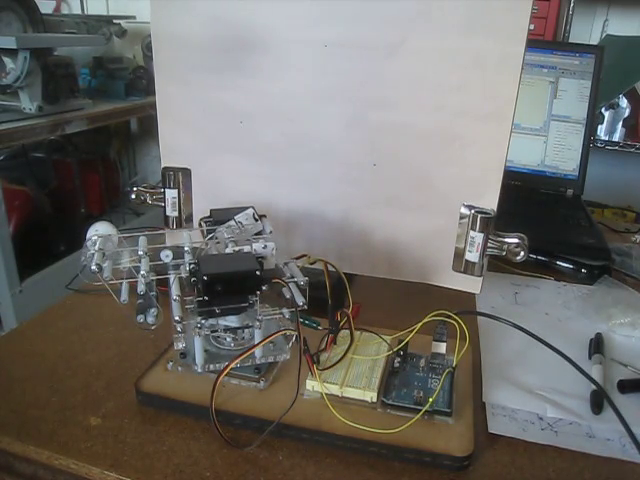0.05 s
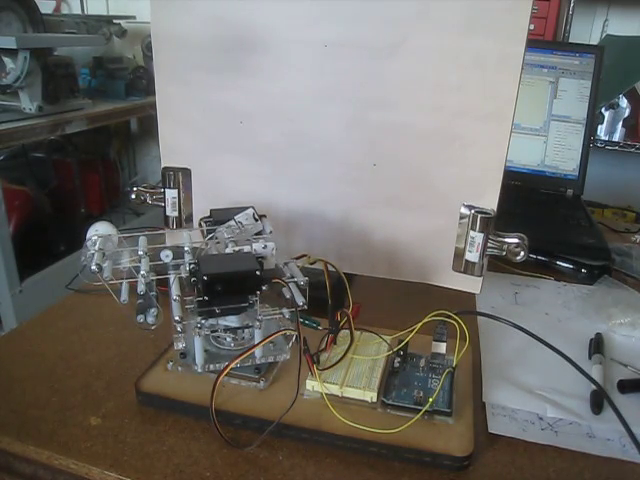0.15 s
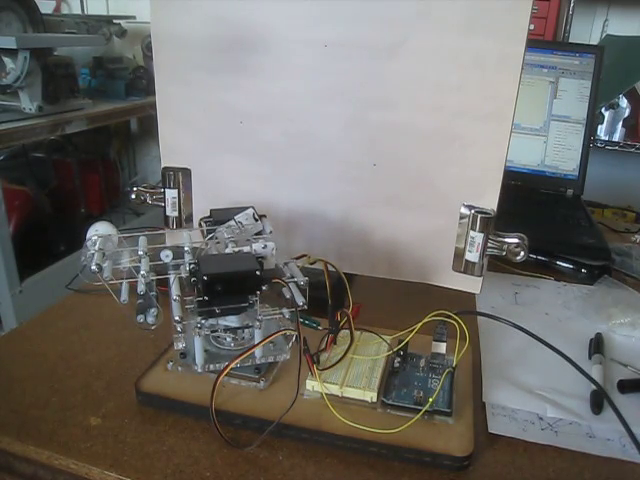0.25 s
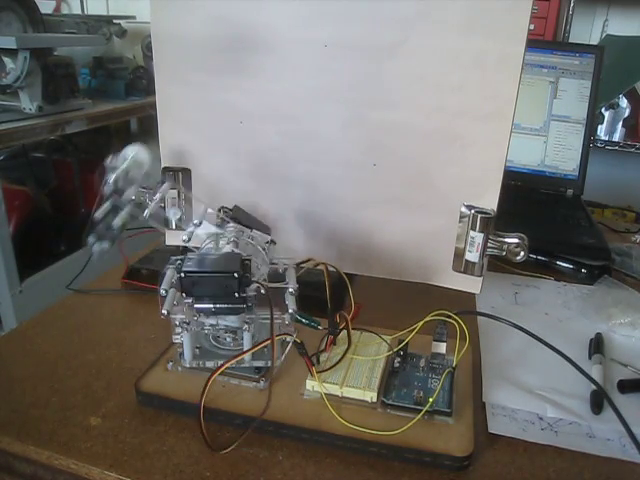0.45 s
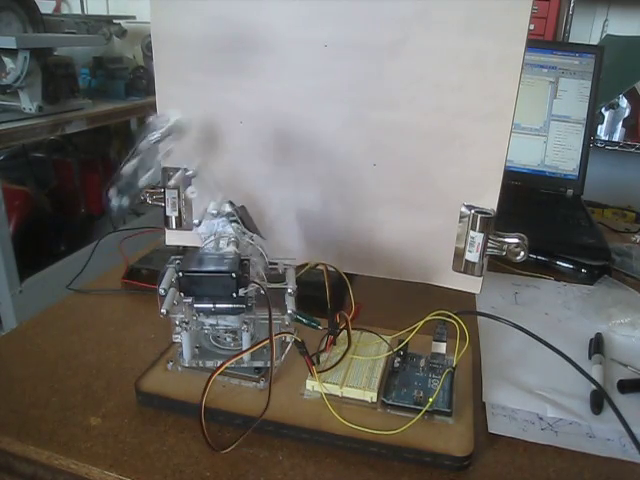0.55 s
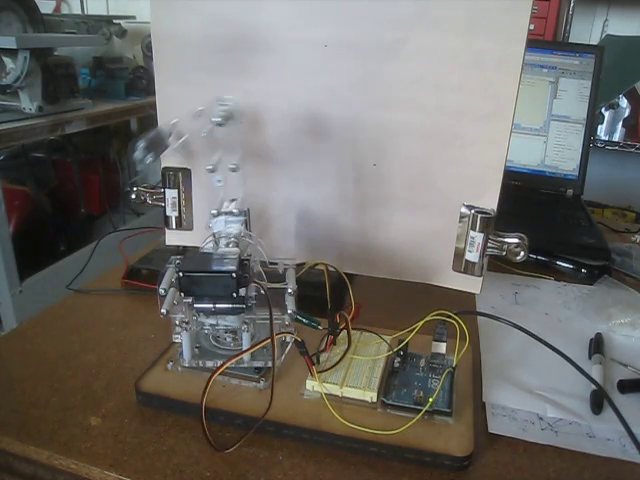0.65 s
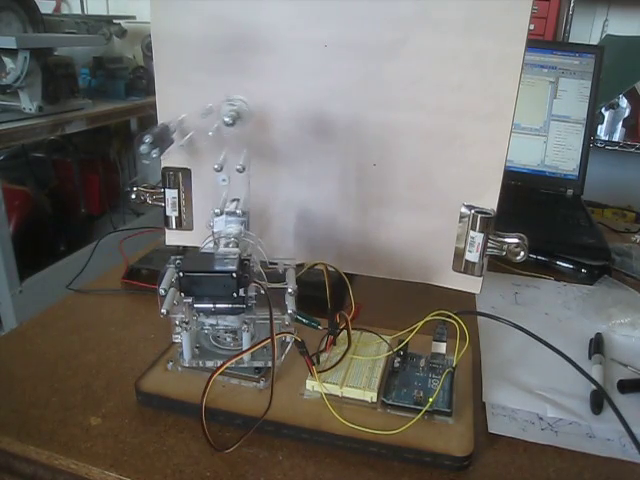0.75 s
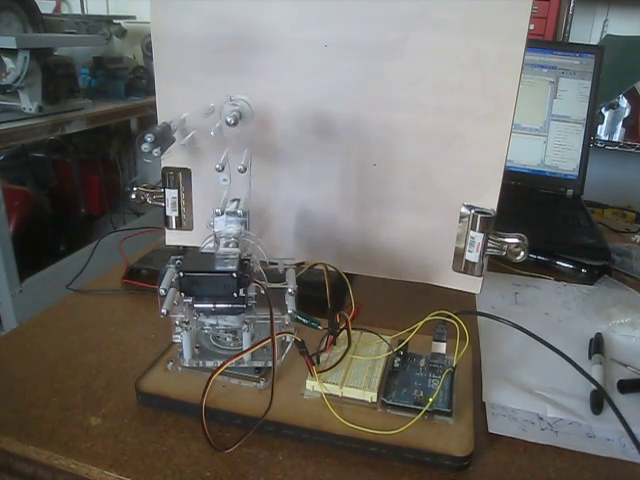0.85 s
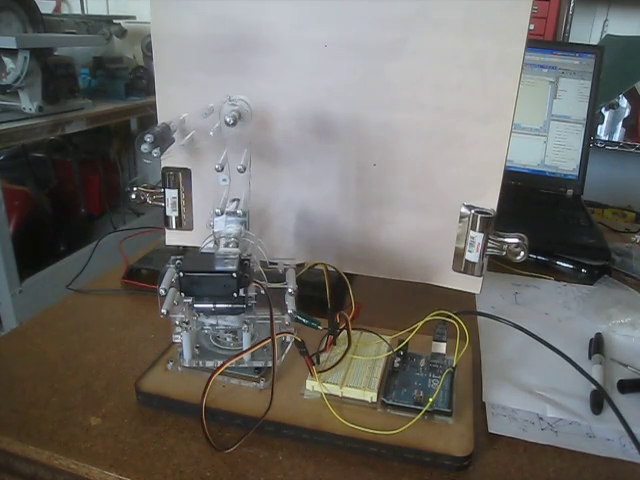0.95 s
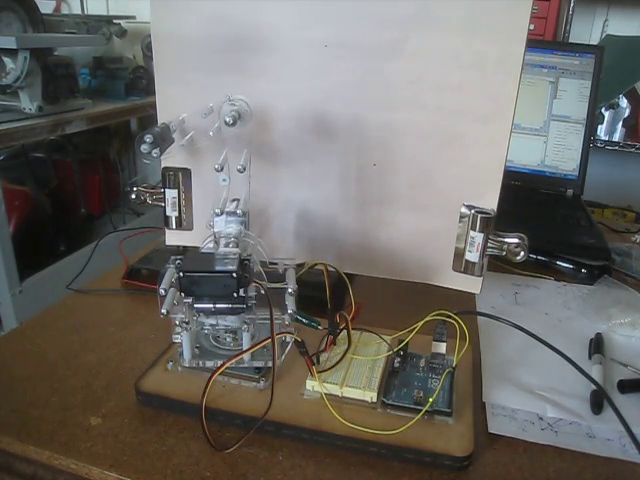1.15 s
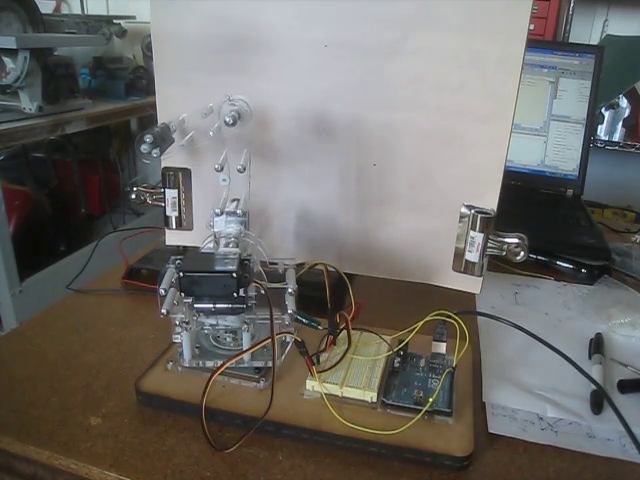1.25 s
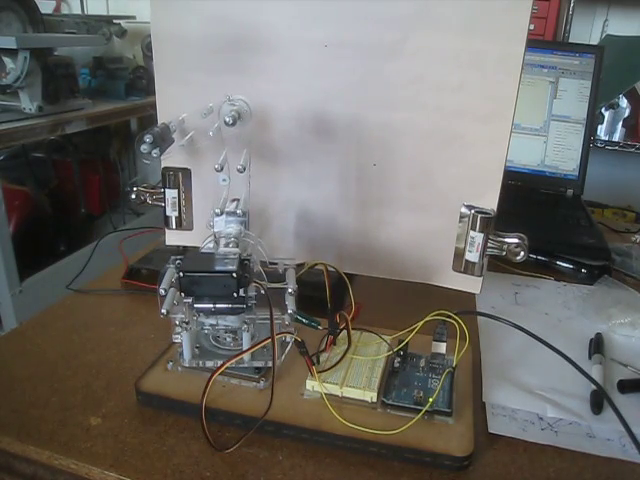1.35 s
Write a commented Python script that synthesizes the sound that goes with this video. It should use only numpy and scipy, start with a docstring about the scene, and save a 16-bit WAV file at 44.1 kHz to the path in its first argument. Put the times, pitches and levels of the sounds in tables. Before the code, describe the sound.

Servo motors move a small plastic arm on a desk. Soft air noise and low hum run throughout. At about 0.2 seconds comes a tiny buzzing twitch; from 0.28 a tick, a sharp squeal and rattling gears lead into a high, raspy whine, climbing by 0.4, wavering, then dropping and stopping near 0.7. Faint ticks follow at 0.7, 0.76 and 0.9, then only quiet room.

```python
"""Robot arm on a desk

Small servos lift and turn a plastic arm: one short twitch, then a half-second move.
Meshing gear teeth whine and rasp, and loose gears chatter through the ringing case; soft noise swells
thicken the whine. A second servo squeals briefly as the move starts, the case rings up in two short bursts,
and joints tick, the last ticks as the arm settles. Filtered noise and phase-drifting tones make the air
noise and hum of a small room.
"""
import sys
import numpy as np
from scipy import signal
from scipy.fft import rfft, irfft
from scipy.io import wavfile

SR = 44100
rng = np.random.default_rng(int(sys.argv[2]) if len(sys.argv) > 2 else 0)


def to_wav(s):
    """Save 16-bit WAV."""
    ch = np.atleast_2d(s).T  # columns
    pcm = np.round(np.clip(ch, -1, 1) * 32767)  # PCM
    wavfile.write(sys.argv[1], SR, pcm.astype(np.int16))


N = 61739
T = np.arange(N) / SR  # time (s)


def amp(db):
    """Logarithmic level: decibels to linear gain."""
    return 10 ** (np.asarray(db) / 20)


def unit(x):
    """Normalisation: scales a signal to rms 1."""
    return x / np.sqrt(np.mean(x ** 2) + 1e-20)


def peaked(x, db):
    """Normalisation: scales a signal to a peak level in dB."""
    return amp(db) * x / abs(x).max()


def curve(rows, axis=1):
    """Linear interpolation: one column of a table, joined by straight lines in time."""
    rows = np.array(rows)
    return np.interp(T, rows[:, 0], rows[:, axis])


def level(rows, axis=1):
    """Amplitude envelope: a dB column as gain, silent outside the table's span."""
    active = (T > rows[0][0]) * (T < rows[-1][0])
    return amp(curve(rows, axis=axis)) * active


def wander(hz):
    """Low-passed noise: a random drift of rms 1, weakening above the given rate."""
    rates = np.fft.rfftfreq(N, 1 / SR)
    return unit(irfft(rfft(rng.standard_normal(N)) / (1 + (rates / hz) ** 2), N))


def colour(x, points):
    """Spectral shaping: gains in dB joined by straight lines over log frequency."""
    hz, db = np.transpose(points)
    log_hz = np.log(np.fft.rfftfreq(N, 1 / SR) + 1)
    return irfft(rfft(x) * amp(np.interp(log_hz, np.log(hz), db)), N)


def burst(start, rise_s, decay_s):
    """Transient envelope: noise that rises quickly and decays exponentially."""
    age = np.maximum(T - start, 0)
    return rng.standard_normal(N) * (1 - np.exp(-age / rise_s)) * np.exp(-age / decay_s)


# Steady tones of nearby equipment: pitch_hz [Hz], level_db [dB rms]
HUM_TONES = [(120, -58), (217, -65.5), (1915, -65), (12000, -92)]
# Relative spectral density of the air noise: frequency_hz [Hz], density_db [dB per Hz]
AIR_SPECTRUM = [(15, -53), (25, -19), (70, -2.5), (92, -6.5), (114, -7), (145, -9), (249, -4.5),
                (285, -9.5), (373, -8), (1370, -12.5), (1650, -11.5), (2760, -17), (2990, -19),
                (13200, -34), (16000, -41)]
AIR_DB = -48  # rms level


def background():
    """Superposition: broadband air noise with mains hum and faint tones under slow phase modulation."""
    hum = 0
    for hz, db in HUM_TONES:
        phase_drift = 0.58 * wander(hz=11)  # radians
        hum = hum + amp(db) * unit(np.sin(2 * np.pi * (hz * T + rng.random()) + phase_drift))
    air = unit(colour(rng.standard_normal(N), AIR_SPECTRUM))
    return hum + amp(AIR_DB) * air


TEETH = 10
FLUTTER, FLUTTER_HZ = .003, 250  # motor speed flutter (rms share) and its rate
TOOTH_JITTER, JITTER_HZ = .085, 700  # uneven mesh (rms radians) and its rate
SHAFT_WOBBLE = 0.066  # sway of the tooth angle in each turn (radians)
SHIMMER, TOOTH_SPREAD = .17, .18  # harmonic flicker and tooth unevenness (rms shares)


def pinion(mesh_hz):
    """Gear meshing: ten harmonics of the tooth rate, varied by shaft sway and uneven teeth."""
    mesh = np.cumsum(mesh_hz * (1 + FLUTTER * wander(FLUTTER_HZ))) / SR  # teeth passed
    shaft = np.sin(2 * np.pi * mesh / TEETH)
    tooth_errors = unit(rng.standard_normal(TEETH))
    unevenness = np.interp(mesh, np.arange(TEETH), tooth_errors, period=TEETH)
    angle = 2 * np.pi * mesh + SHAFT_WOBBLE * shaft + TOOTH_JITTER * wander(JITTER_HZ)
    push = 0
    for k in range(1, 11):
        harmonic = np.cos(k * angle + 2 * np.pi * rng.random())
        push = push + harmonic * (1 + SHIMMER * wander(FLUTTER_HZ))
    return angle, shaft, push * (1 + TOOTH_SPREAD * unevenness)


# Resonances of the case: pitch_hz [Hz], width_hz [Hz], gain_db [dB]
CASE_MODES = [(3950, 760, -5), (5490, 710, 2.5), (6150, 1040, -5.5), (9180, 290, -13)]


def case(x):
    """Modal resonance: the plastic case rings; each resonance filters twice, for steep sides."""
    ringing = 0
    for hz, width_hz, db in CASE_MODES:
        b, a = signal.iirpeak(hz, hz / width_hz, SR)
        ringing = ringing + amp(db) * signal.lfilter(b, a, signal.lfilter(b, a, x))
    return ringing


# Main motor speed: time_s [s], pitch_hz [tooth meshing rate, Hz]
MOTOR_SPEED = [(.215, 1143), (.243, 1373), (.27, 1199), (.3, 1240), (.331, 1316), (.347, 1278),
               (.364, 1359), (.376, 1505), (.388, 1690), (.402, 1840), (.422, 1975), (.438, 1996),
               (.45, 1969), (.466, 1844), (.484, 1793), (.506, 1887), (.528, 1970), (.542, 1928),
               (.558, 1874), (.57, 1879), (.6, 2024), (.616, 2037), (.637, 1990), (.649, 1880), (.66, 1707),
               (.675, 1527), (.71, 900)]
# Gear loudness: time_s [s], whine_gain_db [dB], rasp_level_db [dB]
GEAR_LEVELS = [(.21, -74, -66), (.224, -44, -47), (.243, -36, -33), (.255, -39, -61), (.27, -69, -64),
               (.279, -45, -50), (.287, -49.5, -35), (.298, -49.5, -38), (.328, -46, -36), (.341, -34, -68),
               (.372, -37, -37.5), (.39, -47, -32), (.403, -45, -37), (.44, -31, -37), (.468, -28, -40),
               (.5, -33, -30), (.518, -35.5, -38), (.536, -33, -32), (.562, -28.5, -41.5),
               (.578, -39.5, -28.5), (.59, -40, -35.5), (.615, -30, -34.5), (.645, -35.5, -35.5),
               (.66, -40.5, -33.5), (.678, -38, -48), (.69, -60, -44), (.7, -67, -53), (.72, -56.5, -84)]
# Loose gears shaking the case: time_s [s], level_db [dB]
CHATTER_LEVEL = [(.21, -67), (.232, -44), (.252, -32), (.268, -53), (.287, -36), (.3, -38), (.325, -26.5),
                 (.34, -39), (.35, -23.5), (.36, -31), (.38, -35.5), (.42, -35.5), (.47, -35.5), (.52, -45),
                 (.56, -40), (.6, -46), (.65, -38), (.69, -49.5), (.73, -54)]
# How the case radiates the whine: frequency_hz [Hz], gain_db [dB]
WHINE_RADIATION = [(600, -34), (1300, -14.5), (1600, -12.5), (1800, -16.5), (2000, -11), (2400, -9.5),
                   (3400, -11.5), (3720, 4), (3920, 0.5), (4200, -11.5), (4900, -3.5), (5450, 3.5),
                   (5850, -0.5), (6150, -1), (6700, -41), (7300, -11), (7720, -1.5), (8300, -7.5),
                   (9200, -20), (9800, -0.5), (10800, -12.5), (12000, -10), (13500, -19), (16000, -21)]
# Relative spectral density of the rasp: frequency_hz [Hz], density_db [dB per Hz]
RASP_SPECTRUM = [(300, -27), (1400, -21.5), (2100, 0), (3100, -32), (3800, -2), (4800, 2), (5700, -2),
                 (6400, 2.5), (7000, 4), (8300, 0), (9000, 6), (10000, 1.5), (10500, 7), (11000, 1.5),
                 (11600, 6), (12150, -2.5), (12700, 5), (13900, -5), (15400, 0.5), (16500, -7.5)]
BITE, RASP_PER_TURN = .6, .15  # depth of noise pulsing per tooth and per shaft turn (exponents)
RASP_GRAIN_DB = 1.7  # random graininess (rms dB)


def servo():
    """Amplitude modulation: each tooth pushes (whine), scrapes (rasp) and shakes the case (chatter)."""
    angle, shaft, push = pinion(curve(MOTOR_SPEED))
    pulsing = np.exp(BITE * np.cos(angle) + RASP_PER_TURN * shaft)
    contact = pulsing * amp(RASP_GRAIN_DB * wander(hz=890))
    rasp = unit(colour(contact * rng.standard_normal(N), RASP_SPECTRUM))
    chatter = unit(case(contact * rng.standard_normal(N)))
    whine = colour(push, WHINE_RADIATION) * level(GEAR_LEVELS)
    return whine + rasp * level(GEAR_LEVELS, axis=2) + chatter * level(CHATTER_LEVEL)


# Soft noise swells around 2 to 3 kHz: centre_s [s], level_db [dB]
SWELLS = [(0.231, -46), (0.29, -45), (0.371, -41), (0.392, -36.5)]
# Relative spectral density of the swells: frequency_hz [Hz], density_db [dB per Hz]
SWELL_SPECTRUM = [(1200, -25), (1750, -15), (2100, 3.5), (2450, -9), (2900, 2.5), (3400, -11), (5000, -19)]
SWELL_S = .008  # time from the centre to 1/e of the peak


def noise_swells():
    """Band noise in Gaussian envelopes: soft swells thicken the whine as the motor speeds up."""
    envelope = sum(amp(db) * np.exp(-((T - s) / SWELL_S) ** 2) for s, db in SWELLS)
    return envelope * unit(colour(rng.standard_normal(N), SWELL_SPECTRUM))


# Second servo, labouring under load: time_s [s], pitch_hz [tooth meshing rate, Hz], whine_gain_db [dB]
SQUEAL = [(.272, 1819, -57), (.288, 1840, -31), (.303, 1890, -35.5), (.314, 1900, -26), (.327, 1805, -21),
          (.339, 1715, -30), (.353, 1803, -31), (.359, 1781, -47), (.373, 1910, -28), (.392, 2000, -52),
          (.41, 2050, -60)]
# How its case radiates the whine: frequency_hz [Hz], gain_db [dB]
SQUEAL_RADIATION = [(1200, -33), (1900, -24), (3750, -15.5), (4500, 3), (5400, -0.5), (5750, -7.5),
                    (7300, -32), (7650, -19), (8300, -35), (9000, -5), (9700, -16.5), (16000, -23)]


def second_servo():
    """Resonant radiation: a brief squeal, loudest where its third harmonic meets the case resonance."""
    _, _, push = pinion(curve(SQUEAL))
    return colour(push, SQUEAL_RADIATION) * level(SQUEAL, axis=2)


RISE_S = 0.0011  # rise constant of ticks and case bursts
# Joint ticks: start_s [s], peak_db [dB]
JOINT_TICKS = [(0.2863, -21.5), (.6945, -33.5), (0.7619, -31.5), (0.897, -40.5)]
# Relative spectral density of a tick: frequency_hz [Hz], density_db [dB per Hz]
TICK_SPECTRUM = [(1000, -21), (4000, -1), (6500, -10), (9000, -2), (12500, -3), (16000, -23)]
TICK_S = .0018  # decay constant


def joint_ticks():
    """Impulsive noise: the arm's joints tick in very short coloured bursts."""
    return sum(peaked(colour(burst(s, RISE_S, TICK_S), TICK_SPECTRUM), db) for s, db in JOINT_TICKS)


# Short resonant bursts of the case: start_s [s], peak_db [dB]
CASE_BURSTS = [(0.324, -19.5), (0.3505, -28)]
BURST_S = .004  # decay constant of the noise that drives the case


def case_bursts():
    """Resonant build-up: the case rings up briefly as the whine crosses its resonance (noise-driven here)."""
    return sum(peaked(case(burst(s, RISE_S, BURST_S)), db) for s, db in CASE_BURSTS)


ROOM_T60, ROOM_DB, ROOM_DELAY_S = 0.15, -8, 0.0021  # decay by 60 dB (s), tail gain (dB), delay


def room(x):
    """Reverberation: convolution with a short, dense, decaying noise tail from desk and walls."""
    tail = rng.standard_normal(N) * amp(-60 * T / ROOM_T60) * (T > ROOM_DELAY_S)
    return amp(ROOM_DB) * signal.fftconvolve(x, tail / np.linalg.norm(tail))[:N]


def scene():
    """Superposition: the arm's direct sound, its reverberation and the room noise."""
    arm = servo() + noise_swells() + second_servo() + joint_ticks() + case_bursts()
    return (arm + room(arm) + background())[None]


EDGE_HZ = 16050  # upper band edge


def record(dry):
    """Band limitation: the recorder's linear-phase low-pass."""
    lowpass = signal.firwin(511, EDGE_HZ, window=("kaiser", 9), fs=SR)
    return signal.oaconvolve(dry, lowpass[None], "same")


dry = scene()
out = record(dry)
to_wav(out)
```